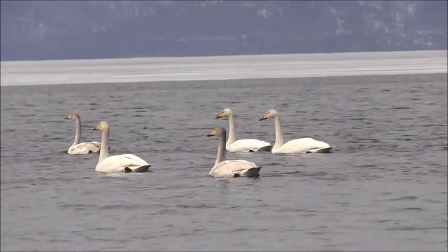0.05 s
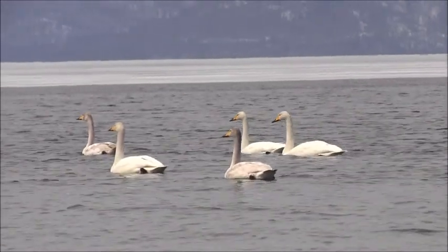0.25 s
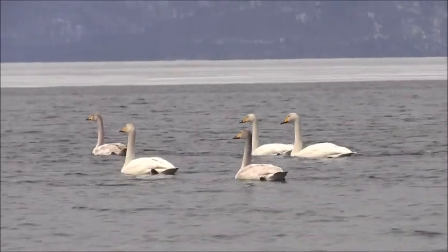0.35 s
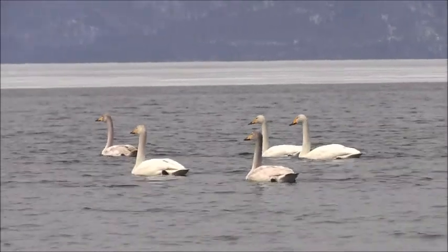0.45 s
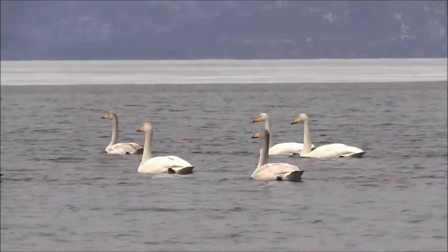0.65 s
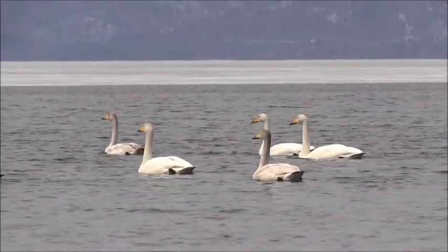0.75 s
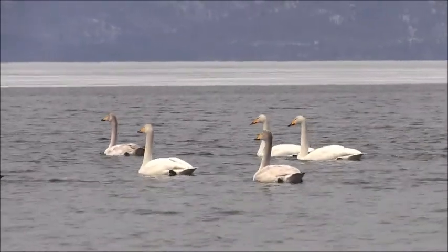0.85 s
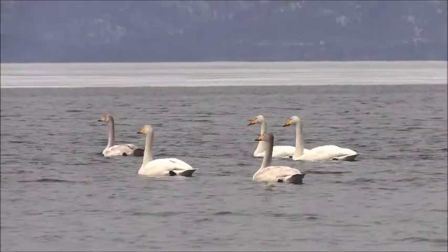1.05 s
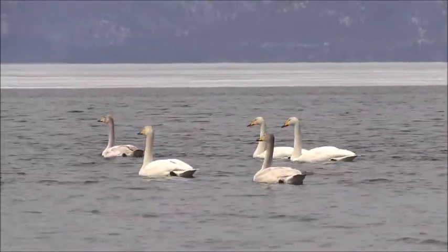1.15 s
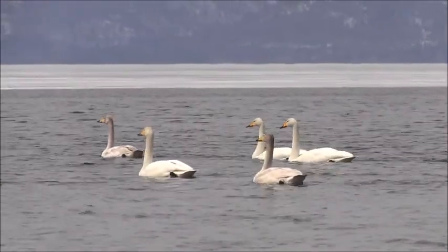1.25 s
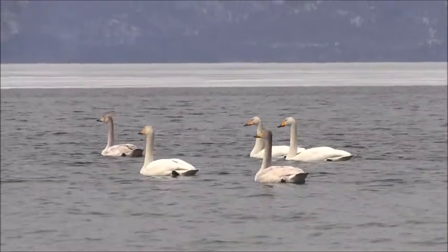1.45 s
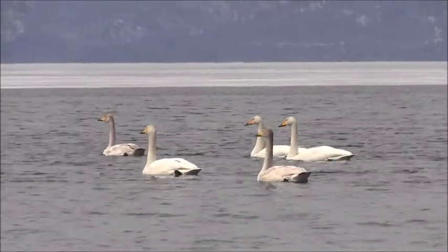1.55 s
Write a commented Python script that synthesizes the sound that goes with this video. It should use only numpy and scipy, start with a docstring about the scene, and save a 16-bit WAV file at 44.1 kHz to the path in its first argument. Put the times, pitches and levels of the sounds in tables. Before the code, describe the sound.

Swans call on a lake. A hoarse note rises at 0.2 seconds into a loud honk at 0.3, ending in a rasp until 0.6. A close, dull handling knock lands at 0.4. A short low honk comes at 0.75 with a click and a small gust on the microphone, then a soft hoot from 1.2 to 1.35. The calls echo faintly over quiet ripple hiss and wind rumble.

```python
"""Swans call on a lake: a hoarse note breaks upward into a loud honk and ends in a rasp, then come
a low honk and a soft two-voiced hoot. Each call is a stack of harmonics, bent in most calls by the
syrinx's second voice; the rasp is pulses and air ringing resonances. A faint echo crosses the water.
Close by, the handled camera knocks and ticks and small gusts bump the microphone.
Wind rumbles and ripples hiss behind it all."""
import sys
import numpy as np
from scipy import signal
from scipy.fft import rfft, irfft
from scipy.io import wavfile

SR = 44100
rng = np.random.default_rng(int(sys.argv[2]) if len(sys.argv) > 2 else 0)


def log_audio(samples):
    """Write samples as a 16-bit WAV file to the path given in sys.argv[1]."""
    # one column per channel
    frames = np.atleast_2d(samples).T
    # limit to full scale, then quantise
    limited = np.clip(frames, -1, 1)
    pcm = np.round(limited * 32767).astype(np.int16)
    wavfile.write(sys.argv[1], SR, pcm)


N = 70560
T = np.arange(N) / SR

JITTER, ROUGH_JITTER, JITTER_HZ, SMEAR_HZ = .0016, .0344, 164, 119
BRIGHTEN_S, DULLEST_DB, LOW_CUT_HZ = .0063, -7.5, 293


def syrinx(curve, tone_db, dulling, second=None, coupling=0, muffle_db=0):
    """Swan voice: harmonics that smear when hoarse and dull as they fade; a second voice adds sidebands."""
    times, hz, db, rough = np.transpose(curve)
    rough = np.clip(np.interp(T, times, rough), 0, 1)
    pitch = np.interp(T, times, hz) * (1 + (JITTER + ROUGH_JITTER * rough ** 2) * wander(JITTER_HZ))
    phase = 2 * np.pi * np.cumsum(pitch) / SR
    out = np.zeros(N)
    if second is not None:
        times2, hz2, db2 = np.transpose(second)
        phase2 = 2 * np.pi * np.cumsum(np.interp(T, times2, hz2)) / SR
        out = np.sqrt(2) * level(times2, db2) * np.sin(phase2)
    bend = coupling * out  # the second voice pushes the phase of the first
    envelope = level(times, db)
    now_db = np.interp(T, times, db)
    effort_db = np.minimum(now_db, .5 * (now_db + np.interp(T - BRIGHTEN_S, times, db)))  # overtones lag
    tilt_db = dulling * np.maximum(effort_db - db.max(), DULLEST_DB)  # per octave
    for k, gain in enumerate(amp(tone_db) / np.linalg.norm(amp(tone_db)), 1):
        angle = k * phase + bend + 2 * np.pi * rng.random()
        hoarse = np.minimum(rough * k ** .4, 1)  # higher harmonics are hoarser
        clean = np.sqrt(2 * (1 - hoarse ** 2)) * np.sin(angle)
        smear = wander(SMEAR_HZ) * np.cos(angle) + wander(SMEAR_HZ) * np.sin(angle)
        colour = amp(tilt_db * np.log2(k) + muffle_db * max(np.log2(k / 1.55), 0))
        out += gain * envelope * colour * (clean + hoarse * smear)
    # The throat radiates little low end.
    return signal.sosfilt(signal.butter(4, LOW_CUT_HZ, "high", fs=SR, output="sos"), out)


def closing_bill(start_s, db_per_s):
    """The closing bill rolls off the overtones ever more steeply, in dB per octave."""
    return -db_per_s * np.maximum(T - start_s, 0)


# Hoarse opening note: t/s, f/Hz, level/dB, roughness/0-1
LEAD_IN = [(.16, 478, -44, 0.55), (.172, 490, -41, 0.52), (.2, 474.7, -38.5, 0.52),
           (.22, 477.7, -39.5, 0.83), (.262, 502.8, -35.5, 0.52), (.273, 488, -30, 0.21),
           (.298, 523, -27.5, 0.23), (.308, 550, -40, 0.4), (.32, 524, -53, 0.3)]
# Its harmonics, from the first up: level/dB
LEAD_IN_TONE = [-2.5, 2, -24, -26, -39, -27.5, -39]
# Its lower second voice: t/s, f/Hz, level/dB
LEAD_IN_SECOND = [(.18, 402.5, -56), (.205, 419, -45), (.23, 407, -47), (.26, 407, -46)]


def lead_in():
    """A gritty note swells and climbs into the honk."""
    return syrinx(LEAD_IN, LEAD_IN_TONE, dulling=.2, second=LEAD_IN_SECOND, coupling=10)


# Arch of the loud honk: t/s, f/Hz, level/dB, roughness/0-1
HONK = [(.296, 600, -33.5, 0.59), (.306, 619.7, -24.5, 0.39), (.315, 632.3, -24, 0.25),
        (.334, 628.7, -24, .1), (.352, 617.6, -26, 0.079), (.37, 595.5, -27.5, 0.13),
        (.382, 577, -31.5, .25), (.398, 532.5, -35.5, 0.18), (.415, 516, -35.5, .3)]
# Its harmonics, from the first up: level/dB
HONK_TONE = [1, -2.5, -15.5, -57, -11.5, -14.5, -19, -44]
# Its upper second voice: t/s, f/Hz, level/dB
HONK_SECOND = [(.292, 749.4, -40), (.31, 760, -30), (.33, 753, -42.5), (.36, 735, -86)]


def honk():
    """The voice breaks upward, bright and loud, then sags as the bill muffles the top."""
    bill = closing_bill(start_s=.352, db_per_s=260)
    return syrinx(HONK, HONK_TONE, dulling=.56, second=HONK_SECOND, coupling=1.3, muffle_db=bill)


# Scoop of the low honk: t/s, f/Hz, level/dB, roughness/0-1
LOW_HONK = [(.733, 488, -71, 0.29), (.744, 440, -37, 0.58), (.753, 420.4, -38.5, 0.15),
            (.768, 424, -37.5, 0.091), (.785, 447, -36, 0.27), (.8, 467, -44, 0.57), (.83, 476, -59, 0.46)]
# Its harmonics, from the first up: level/dB
LOW_HONK_TONE = [-0.5, 2, -18, -21, -39]


def low_honk():
    """One short voice dips in pitch, rough at both ends."""
    return syrinx(LOW_HONK, LOW_HONK_TONE, dulling=.2)


# Soft, nearly level hoot: t/s, f/Hz, level/dB, roughness/0-1
HOOT = [(1.197, 552.4, -47.5, 0.067), (1.215, 556.4, -33, 0.063), (1.245, 567.6, -34, 0.045),
        (1.275, 564.5, -32, 0.042), (1.298, 559, -30.5, 0.11), (1.33, 558, -37, 0.18),
        (1.35, 553, -56, 0.18)]
# Its harmonics, from the first up: level/dB
HOOT_TONE = [2, -12, -18, -19, -27, -25]
# Its lower second voice: t/s, f/Hz, level/dB
HOOT_SECOND = [(1.262, 452, -60), (1.288, 448, -42.5), (1.315, 450, -45.5), (1.35, 448, -68)]


def hoot():
    """A round note, joined by a second voice as the bill closes."""
    bill = closing_bill(start_s=1.265, db_per_s=400)
    return syrinx(HOOT, HOOT_TONE, dulling=.31, second=HOOT_SECOND, coupling=26, muffle_db=bill)


# Hoarse air under the lead-in and honk: t/s, level/dB
BREATH = [(.08, -50.5), (.18, -46.5), (.26, -42.5), (.31, -39.5), (.355, -39), (.392, -36.5), (.41, -40.5),
          (.43, -73)]
# Throat resonances of that air: f/Hz, width/Hz, level/dB
BREATH_THROAT = [(433, 200, -7.5), (667, 270, -2.5), (1140, 430, -7.5), (1640, 245, -5), (2380, 890, -14),
                 (3500, 850, -15.5), (7200, 1900, -35)]
# Rasp that tails the honk: t/s, level/dB
RASP = [(.41, -47), (.425, -28), (.448, -36.5), (.467, -36.5), (.497, -36), (.555, -41.5), (.58, -46),
        (.61, -55)]
# Resonances of the rough rasp; the lowest is a dull scrape following the knock: f/Hz, width/Hz, level/dB
RASP_RESONANCES = [(358, 68, 3.5), (637, 190, -1.5), (863, 54, -0.5), (1044, 27, -9), (1463, 225, -6),
                   (2090, 145, -10.5), (2630, 550, -14.5), (5000, 700, -16.5), (7150, 7200, -27.5)]


def rasp(curve, resonances, pulses_per_s=330, air=.7):
    """Irregular pulses and air ring a set of resonances."""
    cycles = np.cumsum(pulses_per_s * np.exp(.45 * wander(200))) / SR
    pulses = np.diff(np.floor(cycles), prepend=0) * rng.uniform(.44, 1, N)
    drive = unit(pulses) + air * rng.standard_normal(N)
    ring = sum((-1) ** k * amp(db) * signal.lfilter(*signal.iirpeak(hz, hz / width, SR), drive)
               for k, (hz, width, db) in enumerate(resonances))
    return unit(ring) * level(*np.transpose(curve))


def shore_echo(calls, send_db=-22, t60_s=.9, rise_s=.048):
    """The shore scatters a faint tail back over the water."""
    t = T[:SR // 2]
    tail = rng.standard_normal(len(t)) * amp(-60 * t / t60_s) * np.minimum(t / rise_s, 1)
    return amp(send_db) * signal.fftconvolve(calls, tail / np.linalg.norm(tail))[:N]


# Dull knocks on the camera body: t/s, level/dB
KNOCKS = [(.4189, -15), (0.4254, -17), (0.4475, -26)]
# Modes of the body: f/Hz, level/dB, t60/s
BODY_MODES = [(347, -1, 0.027), (457, -2, 0.02), (583, -13.5, 0.039), (1594, -12.5, 0.043),
              (2718, -18.5, 0.072), (4880, -20, 0.022)]
# Crisp snaps of the camera case: t/s, level/dB
SNAPS = [(.7551, -23), (1.589, -27.5)]
# Modes of the case: f/Hz, level/dB, t60/s
CASE_MODES = [(3700, -5.5, 0.0075), (4620, -9, 0.0042), (5100, -2, 0.0037), (7600, -5.5, 0.005),
              (8900, -16, 0.0067), (14800, -15, 0.0036)]


def camera_hits(hits, modes, rise_s):
    """Each handling hit rings the camera's damped modes."""
    out = np.zeros(N)
    for start, db in hits:
        t = np.maximum(T - start, 0)
        ring = sum(amp(mode_db - 60 * t / t60) * np.cos(2 * np.pi * hz * t) for hz, mode_db, t60 in modes)
        out += amp(db) * ring * (1 - np.exp(-t / rise_s))
    return out


# Tiny ticks and drips: t/s, f/Hz, width/octaves, level/dB, decay/s
TICKS = [(.059, 6900, 0.25, -44, .002), (0.6174, 6300, 0.17, -37.5, 0.0012),
         (0.6173, 10100, .13, -36, 0.0011), (0.6186, 2300, .5, -39.5, 0.0012),
         (0.851, 1280, 0.09, -38, 0.0044)]
# Airy swishes: t/s, f/Hz, width/octaves, level/dB, half length/s
SWISHES = [(0.392, 3900, 0.92, -44.5, 0.014), (0.435, 6000, 0.62, -46.5, 0.019),
           (0.631, 6100, 1, -48.5, 0.018), (1.304, 2680, .4, -49, 0.013), (1.354, 3200, 0.16, -53.5, 0.016),
           (1.537, 7440, 0.61, -47, 0.011)]


def ticks_and_swishes():
    """Bursts of band noise: a sharp attack for a tick, a smooth swell for a swish."""
    out = np.zeros(N)
    for start, hz, octaves, db, decay in TICKS:
        t = np.maximum(T - start, 0)
        out += amp(db) * band(hz, octaves) * 2 * (np.exp(-t / decay) - np.exp(-5 * t / decay))
    for middle, hz, octaves, db, half in SWISHES:
        out += amp(db) * band(hz, octaves) * np.exp(-.5 * ((T - middle) / half) ** 2)
    return out


# Colour of the wind rumble: f/Hz, relative level/dB
RUMBLE = [(20, -25), (45, -9), (85, -0.5), (150, -4), (230, -9), (400, -30), (1500, -61)]
# Gusts that ride the rumble: t/s, level/dB
GUSTS = [(0, -65), (.35, -62), (0.426, -47), (.5, -52), (.58, -53), (.64, -47), (.68, -51.5), (.75, -39.5),
         (.81, -43), (.88, -51.5), (.94, -53), (1.07, -53), (1.24, -63), (1.35, -46), (1.44, -52.5),
         (1.53, -51), (1.6, -54)]
# Soft bumps of wind and handling: t/s, f/Hz, level/dB, width/s
BUMPS = [(.412, 302, -35, 0.0072), (.424, 154, -45, 0.0054), (0.601, 110, -28, 0.0035),
         (0.631, 163, -23.5, 0.0015), (0.7837, 120, -21.5, 0.0016), (0.934, 86, -39, 0.0041),
         (1.002, 79, -37.5, 0.0051), (1.4825, 137, -35, 0.0036)]


def wind():
    """Gusting low rumble, with brief swings of pressure at the microphone."""
    out = coloured(RUMBLE) * level(*np.transpose(GUSTS))
    for middle, hz, db, width in BUMPS:
        t = T - middle
        out += amp(db) * np.sin(2 * np.pi * hz * t) * np.exp(1 - np.hypot(1, t / width))
    return out


# Colour of the lake bed of hiss: f/Hz, relative level/dB
WASH = [(120, 7), (200, -2.5), (232, -2), (328, -4.5), (465, -3.5), (1480, -9), (1710, -9.5), (1910, -9),
        (3310, -14), (9060, -18), (16000, -28.5)]


def lake(level_db=-47, flutter_db=.49, flutter_hz=30.2):
    """Far ripples and air blend into an even hiss."""
    return amp(level_db + flutter_db * wander(flutter_hz)) * coloured(WASH)


def spray(drops_per_s=130, decay_s=.0025, level_db=-61):
    """Tiny ripples fizz at random on top of the hiss."""
    drops = (rng.random(N) < drops_per_s / SR) * rng.uniform(.64, 1, N)
    bursts = signal.lfilter([1], [1, -np.exp(-1 / (decay_s * SR))], drops)
    return amp(level_db) * unit(bursts * band(hz=9200, octaves=.53))


def amp(db):
    """Decibels to gain."""
    return 10 ** (np.asarray(db) / 20)


def unit(x):
    """Scales to rms 1."""
    return x / np.sqrt(np.mean(abs(x) ** 2) + 1e-20)


def level(times, db):
    """Gain envelope along a level curve, with 5 ms fades to silence outside it."""
    gate = np.interp(T, [times[0] - .005, times[0], times[-1], times[-1] + .005], [0, 1, 1, 0])
    return amp(np.interp(T, times, db)) * gate


def noise(shape):
    """Noise of rms 1 whose spectrum is shape(f/Hz)."""
    hz = np.fft.rfftfreq(N, 1 / SR) + 1
    return unit(irfft(rfft(rng.standard_normal(N)) * shape(hz), N))


def coloured(points):
    """Noise through an EQ curve of (f/Hz, level/dB) points, rolled off at the bottom."""
    hz, db = np.transpose(points)
    return noise(lambda f: amp(np.interp(np.log(f), np.log(hz), db)) * f / (f + hz[0] / 2))


def band(hz, octaves):
    """Noise in a bell around one frequency."""
    return noise(lambda f: np.exp(-.5 * (np.log2(f / hz) / octaves) ** 2))


def wander(hz):
    """Random modulation, mostly slower than hz."""
    return noise(lambda f: 1 / (1 + (f / hz) ** 2))


def scene():
    """Mono mix: swans and their echo up front, close handling, wind and water behind."""
    swans = lead_in() + honk() + rasp(BREATH, BREATH_THROAT) + rasp(RASP, RASP_RESONANCES)
    swans += hoot() + low_honk()
    handling = camera_hits(KNOCKS, BODY_MODES, rise_s=.00085) + camera_hits(SNAPS, CASE_MODES, rise_s=.0001)
    return (swans + shore_echo(swans) + handling + ticks_and_swishes() + wind() + lake() + spray())[None]


def record(dry):
    """A steep high cut at 16.1 kHz trims the top of the mix."""
    high_cut = signal.firwin(511, 16100, window=("kaiser", 9), fs=SR)
    return signal.oaconvolve(dry, high_cut[None], "same")


dry = scene()
out = record(dry)
log_audio(out)
```